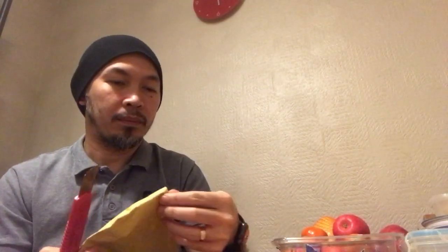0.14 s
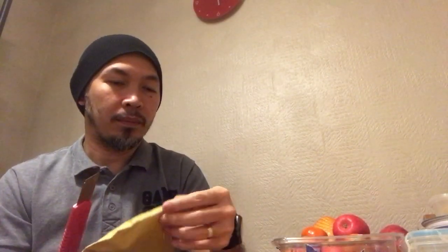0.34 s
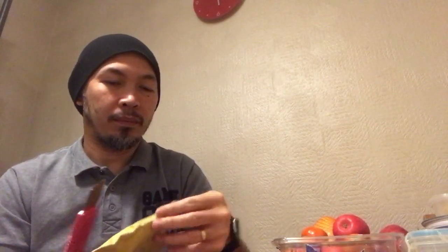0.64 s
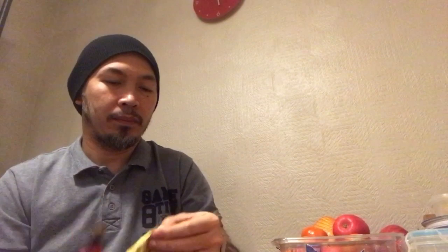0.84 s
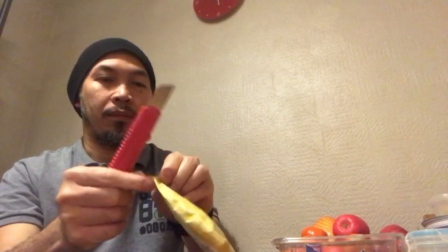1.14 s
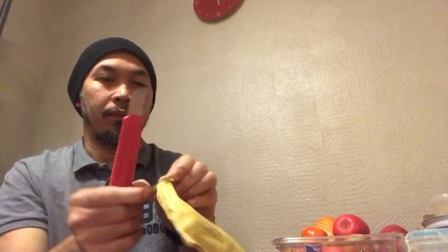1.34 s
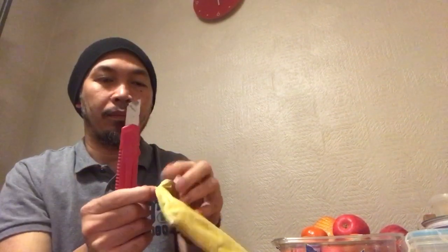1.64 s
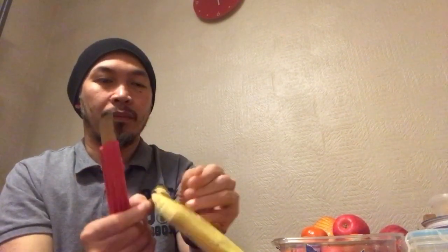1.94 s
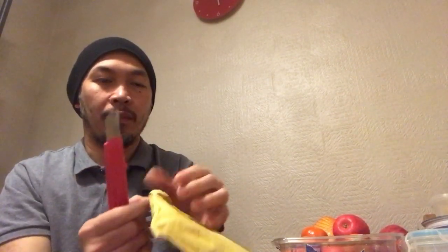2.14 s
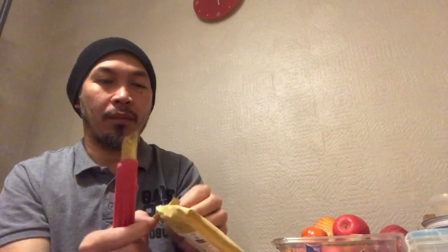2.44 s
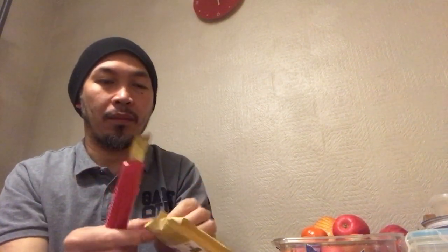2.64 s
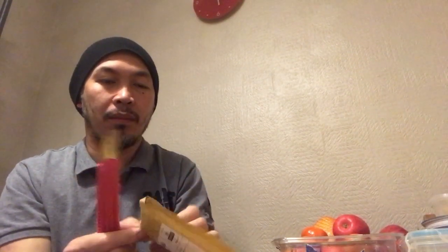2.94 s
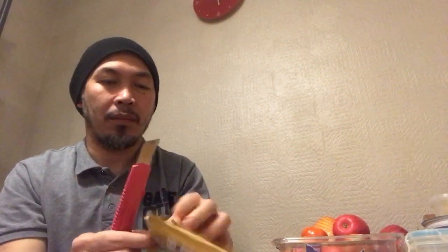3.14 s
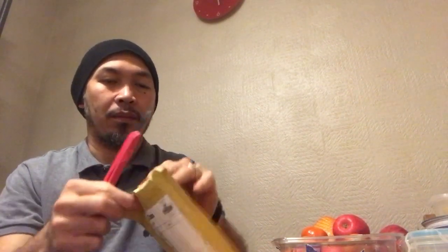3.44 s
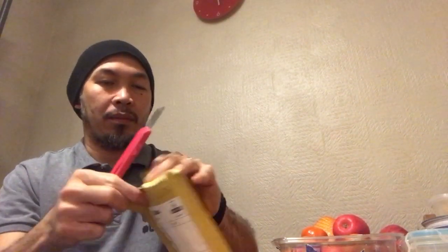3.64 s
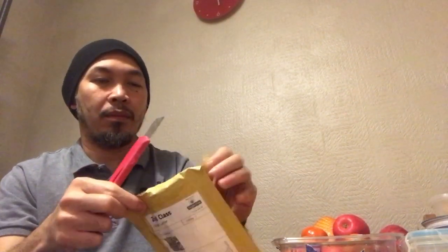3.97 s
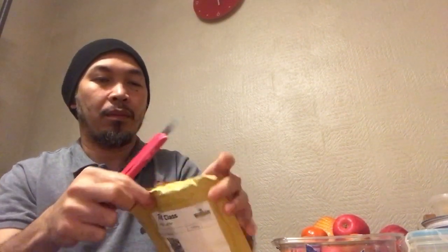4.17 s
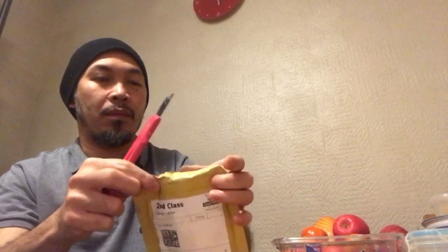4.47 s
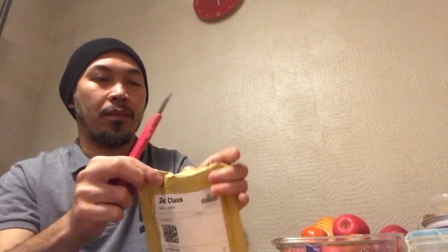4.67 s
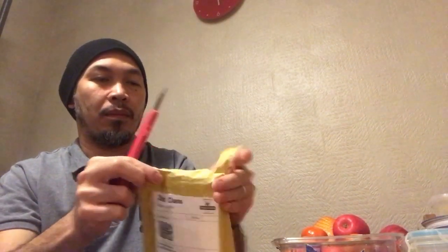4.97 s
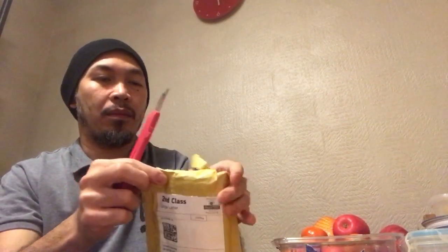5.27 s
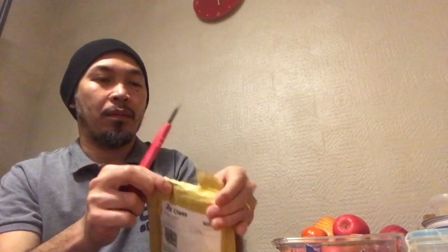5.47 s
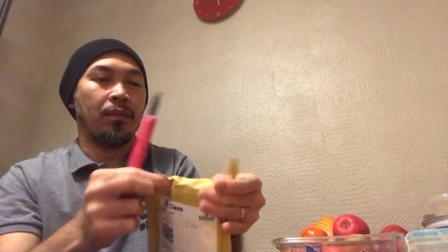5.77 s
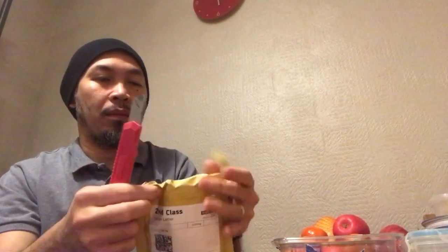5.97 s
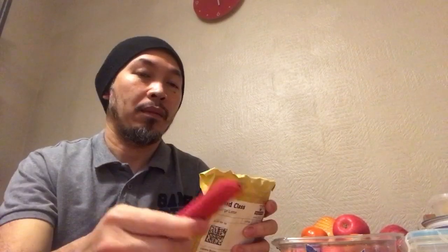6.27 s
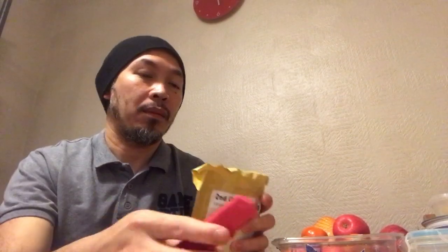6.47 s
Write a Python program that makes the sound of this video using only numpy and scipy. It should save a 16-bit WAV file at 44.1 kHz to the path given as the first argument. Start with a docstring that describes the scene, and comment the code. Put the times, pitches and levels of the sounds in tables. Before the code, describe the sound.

Close by in a small room, stiff paper rustles and crackles in irregular bursts as a padded envelope is gripped and opened. A knife blade ticks once, then four quick rips come among sharp paper snaps and soft, dull bumps. The crinkling grows fuller after the tearing, stops abruptly for a moment and ends with light handling. A faint, steady rumble lies underneath.

```python
"""Soft creasing of stiff paper comes first: a padded envelope is handled and torn open, close by at a table in
a small room. Each grip creases and rubs the paper and flexes its padding; panels buckle in single snaps, a
knife blade ticks once, and the flap rips in four short pulls. Near the end the scene changes: the opening stops
dead, and light handling goes on. A low, steady ambience lies under it all."""
import sys
import numpy as np
from scipy import signal
from scipy.fft import rfft, irfft, next_fast_len
from scipy.io import wavfile
from scipy.ndimage import uniform_filter1d, map_coordinates

SR = 44100
rng = np.random.default_rng(int(sys.argv[2]) if len(sys.argv) > 2 else 0)


def bounce(signal):
    """Save signal as a 16-bit WAV file at the path given by the first command-line argument."""
    frames = np.transpose(np.atleast_2d(signal))
    limited = np.clip(frames, -1, 1)
    pcm = np.round(limited * 32767).astype(np.int16)
    wavfile.write(sys.argv[1], SR, pcm)


N = 291573

# Tone colours of the sources. Each row: frequency in Hz, relative level in dB.
AMBIENCE_EQ = [(20, -18), (50, -5.5), (85, 1.5), (130, -2.5), (200, -7), (370, -4), (600, -23.5),
               (2000, -23), (6000, -22.5), (16000, -50)]
PADDING_EQ = [(70, -28.5), (130, -3.5), (240, -8.5), (380, 2), (490, -1.5), (620, 4.5), (850, -0.5),
              (1400, -30)]
CREASE_EQ = [(350, -30.5), (750, -10.5), (950, 1), (1300, 1), (1900, -2), (2400, -2), (2900, -7),
             (4100, -6.5), (5000, -18), (7000, -17.5), (10000, -37), (16000, -49)]
RUB_EQ = [(2500, -1.5), (4500, 7), (7000, 2.5), (9300, 2), (10300, -3), (12000, 1.5), (14000, 0.5),
          (16000, -10.5)]
CRACK_EQ = [(2000, -6), (3500, 3.5), (6000, 7.5), (8500, -0.5), (10300, -5), (12500, -1.5), (16000, -12.5)]
TEAR_EQ = [(150, -44), (400, -22), (740, -16), (1000, -5.5), (1280, 1.5), (1750, -8.5), (2350, -8.5),
           (4000, -13.5), (6000, -37), (16000, -22)]
# The room's tail. Each row: frequency in Hz, seconds to fade by 60 dB.
ROOM_DECAY = [(150, 0.83), (1200, 0.18), (5000, 0.46), (15000, 0.16)]
# The hands jolt the envelope. Each row: start in seconds, level in dB, decay time in seconds.
HAND_BUMPS = [(1.945, -31.5, 0.018), (3.152, -30, 0.022), (3.49, -34, 0.021), (3.55, -36.5, .053),
              (4.69, -32, .015), (4.825, -32, 0.019), (5.08, -34, 0.013), (6.19, -18, 0.0059)]
# A finger dents the padding. Each row: start in seconds, level in dB.
FINGER_DENTS = [(1.935, -26), (3.152, -22), (3.225, -24.5), (4.169, -23.5), (4.441, -30.5), (4.82, -10.5),
                (5.051, -26.5), (5.828, -26), (5.863, -22.5), (5.977, -28.5)]
# Between grips the held envelope keeps creasing faintly. Each row: time in seconds, level in dB.
HOLDING_BED = [(0, -48), (.25, -54.5), (.68, -42), (1.03, -42.5), (1.7, -45.5), (2.13, -51.5), (2.35, -44),
               (3.05, -37), (3.6, -40), (4.03, -41.5), (4.55, -33.5), (4.9, -35), (5.15, -45),
               (5.27, -42.5), (5.45, -41), (6.2, -37)]
# The fingers grip and shift. Each row: start in seconds, length in seconds, creasing level in dB,
# rubbing in dB against the creasing.
FINGER_GRIPS = [(.008, 0.012, -34.5, -24), (0.295, 0.027, -42.5, -9), (.35, .05, -34, -7.5),
                (0.605, 0.016, -39, -7), (0.713, .08, -35, -11), (0.863, 0.1, -39, -9),
                (1.116, 0.066, -31.5, -6.5), (1.198, 0.14, -34, 2.5), (1.331, 0.09, -30, -4),
                (1.546, 0.13, -36, -9), (1.916, 0.034, -27.5, -12), (2.219, .11, -41, -10.5),
                (2.454, 0.054, -37, -13.5), (2.583, 0.13, -33.5, -14.5), (2.86, 0.13, -31, -8.5),
                (3.133, 0.032, -33, -13), (3.213, 0.11, -34, -15), (3.382, 0.013, -31.5, -11),
                (3.434, 0.13, -34, -16.5), (4.089, 0.033, -28, -8.5), (4.166, 0.024, -28.5, -10.5),
                (4.393, 0.086, -29.5, -12.5), (4.615, .14, -24.5, -8), (4.762, 0.083, -27.5, -2.5),
                (4.938, 0.046, -24.5, -7.5), (5.044, 0.053, -31, -5.5), (5.297, 0.12, -31.5, -9.5),
                (5.484, .16, -25.5, -11.5), (5.722, 0.055, -26, -13), (5.824, 0.035, -29.5, -19),
                (6.052, 0.053, -32, -11), (6.194, 0.014, -25, -15), (6.263, 0.24, -45.5, -16),
                (6.334, 0.063, -36.5, -9)]
# Paper panels buckle. Each row: start in seconds, level in dB, ring pitch in Hz, crack trim in dB.
PANEL_SNAPS = [(0.6023, -22.5, 3850, -6.5), (0.749, -16, 1830, -9), (0.7567, -22.5, 2770, -5),
               (0.7802, -19, 2860, -0.5), (0.7846, -17.5, 3000, -2), (0.8742, -14.5, 2420, -1),
               (0.9148, -19.5, 4400, -2), (0.992, -29, 1960, -19), (1.081, -30, 2020, -3.5),
               (1.1264, -14, 1750, -21), (1.3116, -5.5, 1315, -41), (1.3515, -19, 1370, -28),
               (1.4132, -23.5, 1990, -22), (1.4424, -25, 1680, -24), (1.5567, -26.5, 1950, -10),
               (1.6427, -19.5, 1320, -13), (1.757, -28.5, 1710, -17), (1.7866, -19.5, 1890, -18),
               (1.797, -11, 2310, -5), (1.8195, -16, 1660, -16), (1.8539, -13, 2390, 0.5),
               (1.901, -16.5, 1340, -12), (1.9351, -17, 1340, -15), (2.2975, -27, 2230, -29),
               (2.3512, -27, 1190, -35), (2.3953, -25, 1760, -37), (2.5736, -31, 2480, -2.5),
               (2.8764, -15, 2010, -16), (2.9072, -14.5, 2580, -10), (2.959, -22, 2100, -23),
               (3.1396, -13.5, 2700, -31), (3.1448, -10, 2480, -11.5), (3.1529, -17.5, 2200, -4),
               (3.2251, -20.5, 2530, -22), (3.269, -14.5, 1450, -11), (3.4538, -22.5, 1680, -12),
               (3.693, -9.5, 2100, -3.5), (3.7137, -10, 1480, -25), (3.7196, -8, 1290, -23),
               (4.0815, -23, 3050, -12), (4.17, -22, 2300, -26), (4.4975, -18, 1980, -6.5),
               (4.579, -23, 1270, -18), (4.6807, -10, 2380, -19), (4.7754, -7.5, 1340, -11),
               (4.792, -13, 1240, -21), (4.8205, -4, 1900, -10), (4.8241, -4.5, 2140, -24),
               (4.8468, -8.5, 1010, -18), (4.9134, -16.5, 1150, -25), (4.9775, -16, 1330, -5),
               (5.2294, -32, 2440, -19), (5.2947, -19.5, 2890, -11), (5.5005, -9.5, 1560, -32),
               (5.6868, -19, 1640, -33), (5.8434, -20.5, 1160, -22), (5.8639, -20, 1240, -32),
               (5.9776, -18, 1220, -28), (6.0585, -19, 1470, -21), (6.2015, -17.5, 1320, -19),
               (6.335, -27, 3200, 5.5), (6.355, -24, 2250, -7), (6.3724, -29, 3200, -13)]
# Pulls that rip the flap. Each row: start in seconds, length in seconds, tearing level in dB,
# parting fibres in dB against the tearing, tilt of the fibres' tone in dB per octave.
FLAP_PULLS = [(1.81, 0.089, -20, -4.5, 1.5), (2.743, 0.072, -22, -4, -4), (3.659, 0.095, -12, -10, 1.5),
              (3.861, .1, -14.5, -12, 2.5)]

CUT_S = 6.211  # the scene changes here


def amp(db):
    """Decibels to gain."""
    return 10 ** (np.asarray(db) / 20)


def unit(x):
    """Scale to rms 1."""
    return x / np.sqrt(np.mean(x ** 2) + 1e-20)


def burst(x):
    """Scale a short sound to the energy of 4 ms at rms 1."""
    return x / np.linalg.norm(x) * np.sqrt(.004 * SR)


def along(points, hz):
    """Read a curve of (Hz, value) points on a log frequency axis."""
    freqs, values = np.transpose(points)
    return np.interp(np.log(hz + 1), np.log(freqs + 1), values)


def wobble(rate):
    """A smooth random curve with rate knots a second."""
    knots = rng.standard_normal(int(N * rate / SR) + 4)
    return map_coordinates(knots, [np.arange(N) * rate / SR])


def add(track, start, sound):
    """Mix a sound into a track at start seconds."""
    part = track[max(0, round(start * SR)):][:len(sound)]
    part += sound[:len(part)]


def coloured(x, eq, size=2048):
    """Minimum-phase EQ, so that clicks keep their sharp front; rms 1."""
    gains = amp(along(eq, np.fft.rfftfreq(size, 1 / SR)))
    cepstrum = irfft(np.log(gains))
    cepstrum[1:size // 2] *= 2
    cepstrum[size // 2 + 1:] = 0
    impulse = irfft(np.exp(rfft(cepstrum)))
    return unit(signal.fftconvolve(x, impulse)[:len(x)])


def crackle(rate, spread_db, friction):
    """Tiny random breaks of uneven size, about rate a second, over a share of smooth friction."""
    sizes = amp(spread_db * np.clip(rng.standard_normal(N), -2, 2)) * rng.choice([-1, 1], N)
    breaks = sizes * (rng.random(N) < rate / SR)
    return unit(breaks) + friction * rng.standard_normal(N)


def flexed(x, depth_db, size=256, frames=14):
    """The sheet's resonances shift as it bends: a random comb of gains drifts over the given frames."""
    spectrum = signal.stft(x, nperseg=size)[2]
    comb = uniform_filter1d(rng.standard_normal(spectrum.shape), size=3, axis=0)
    comb = unit(uniform_filter1d(comb, size=frames, axis=1))
    return unit(signal.istft(spectrum * amp(depth_db * comb), nperseg=size)[1][:N])


def facets(x):
    """Each break rings in its own small facet of paper, so the colour keeps changing."""
    return flexed(x, depth_db=4.5, size=128, frames=4)


def stroke(start, length, attack_s, release_s, arch_db):
    """Gain of one hand move: it takes hold, presses hardest halfway and lets go; none crosses the cut."""
    t = np.arange(N) / SR
    progress = np.clip((t - start) / length, 0, 1)
    fades = np.exp(np.minimum(t - start, 0) / attack_s - np.maximum(t - start - length, 0) / release_s)
    arch = amp(-arch_db * (2 * progress - 1) ** 2)
    return fades * arch * ((t < CUT_S) | (start > CUT_S))


def ambience():
    """A steady bed of low rumble and faint hiss."""
    return amp(-50.0) * coloured(rng.standard_normal(N), AMBIENCE_EQ)


def echoes(walls_db=-19.0, tail_db=-13.0):
    """Table, chest and near wall return quick slaps; the room adds a short tail."""
    hz, t, noise = signal.stft(rng.standard_normal(SR // 2), SR, nperseg=256)
    fade = amp(-60 * t / along(ROOM_DECAY, hz)[:, None])
    tail = signal.istft(noise * fade, SR, nperseg=256)[1]
    response = np.zeros(SR // 2)
    add(response, .006, amp(tail_db) * tail / np.linalg.norm(tail))
    for delay in rng.uniform(.0015, .012, size=7):
        add(response, delay, amp(walls_db) * rng.choice([-1, 1], size=1))
    return response


def room(x, size=8192):
    """The envelope keeps moving, so each short stretch of sound meets a new pattern of echoes."""
    out = x.copy()
    for start in range(0, N, size):
        stretch = x[start:start + size]
        if stretch.any():
            add(out, start / SR, signal.fftconvolve(stretch, echoes()))
    return out


def bumps(pitch_hz=82, attack_s=0.0043):
    """A jolt of the hands and envelope gives a soft low thump."""
    out, t = np.zeros(N), np.arange(SR // 4) / SR
    tone = np.sin(2 * np.pi * pitch_hz * t) * (1 - np.exp(-t / attack_s))
    for start, db, decay_s in HAND_BUMPS:
        add(out, start, amp(db) * tone * np.exp(-t / decay_s))
    return out


def dents(decay_s=0.0067):
    """The padding gives way under a finger with a dull pop."""
    out, t = np.zeros(N), np.arange(SR // 16) / SR
    for start, db in FINGER_DENTS:
        pop = coloured(rng.standard_normal(len(t)), PADDING_EQ) * np.exp(-t / decay_s)
        add(out, start, amp(db) * burst(pop))
    return out


def blade(start_s=1.1268, decay_s=0.00046):
    """The thin knife blade catches the edge of the envelope with one bright tick."""
    out, t = np.zeros(N), np.arange(SR // 50) / SR
    ring = np.sin(2 * np.pi * 11600 * t) + np.sin(2 * np.pi * 13100 * t)
    add(out, start_s, amp(-11) * burst(ring * np.exp(-t / decay_s)))
    return out


def handling(holding_rub_db=-10.5, settled_db=-57):
    """Gain rides for creasing and rubbing: the grips on top of the faint stir of holding."""
    times, levels_db = np.transpose(HOLDING_BED)
    crease_power = amp(np.interp(np.arange(N) / SR, times, levels_db, right=settled_db)) ** 2
    rub_power = crease_power * amp(holding_rub_db) ** 2
    for start, length, db, rub_db in FINGER_GRIPS:
        force = amp(db) * stroke(start, length, attack_s=0.016, release_s=0.019, arch_db=2)
        crease_power += force ** 2
        rub_power += (amp(rub_db) * force) ** 2
    return np.sqrt(crease_power), np.sqrt(rub_power)


def rustle(padding_db=-11.5):
    """Fingers crease the paper, flex the padding and slide over the surface, in uneven clumps."""
    crease_gain, rub_gain = handling()
    clumps = amp(2.7 * wobble(60))
    creases = crackle(rate=480, spread_db=4.0, friction=1.0)
    paper = flexed(coloured(facets(creases), CREASE_EQ), depth_db=1.0)
    crunch = creases + crackle(rate=200, spread_db=12.5, friction=0.57)
    padding = amp(padding_db) * coloured(crunch, PADDING_EQ)
    grit = 0.45 * creases + crackle(rate=1400, spread_db=8.5, friction=0.99)
    rubbing = flexed(coloured(grit, RUB_EQ), depth_db=-0.2)
    return clumps * (crease_gain * (paper + padding) + rub_gain * rubbing)


def snaps(ring_db=-1, flutter_db=-5.5, thud_db=-19.5):
    """A panel pops through: a brief ring, a flutter in the sheet, a crack and a thud in the padding."""
    out, t = np.zeros(N), np.arange(SR // 16) / SR
    rise = 1 - np.exp(-t / 0.0002)
    crack_fade = np.exp(-t / 0.0001) + 0.064 * np.exp(-t / 0.0015)
    for start, db, hz, crack_db in PANEL_SNAPS:
        noise = rng.standard_normal((3, len(t)))
        overtone_hz = hz * rng.uniform(1.455, 2.22)
        # a panel needs about half a cycle to gather speed
        speed = np.sin(2 * np.pi * hz * t) * np.exp(-t * hz / 0.94) * (1 - np.exp(-2 * t * hz))
        speed += 0.058 * np.sin(2 * np.pi * overtone_hz * t) * np.exp(-t * hz / 2.7)
        # a small panel radiates its acceleration, which thins out the bass
        ring = amp(ring_db) * rng.choice([-1, 1]) * burst(np.gradient(speed * rise))
        flutter = amp(flutter_db) * burst(coloured(noise[0], CREASE_EQ) * rise * np.exp(-t / 0.0033))
        crack = amp(crack_db + 0.5) * burst(coloured(noise[1], CRACK_EQ) * rise * crack_fade)
        thud = amp(thud_db) * burst(coloured(noise[2], PADDING_EQ) * np.exp(-t / 0.0044))
        add(out, start, amp(db) * (ring + flutter + crack + thud))
    return out


def rips(pivot_hz=6000):
    """Fibres part in a fast, uneven run with a fine hiss; each break tugs the sheet, which rings."""
    # the tear catches and runs on, many times within one pull
    catches = unit(amp(1.54 * wobble(130)))
    breaks = crackle(rate=1500, spread_db=3.0, friction=0.4)
    sheet = coloured(facets(breaks * catches), TEAR_EQ)
    parting = catches * (0.5 * breaks + rng.standard_normal(N))
    out = np.zeros(N)
    for start, length, db, fibres_db, tilt_db in FLAP_PULLS:
        fibre_eq = [(hz, level + tilt_db * np.log2(hz / pivot_hz)) for hz, level in RUB_EQ]
        fibres = amp(fibres_db) * coloured(parting, fibre_eq)
        pull = amp(db) * stroke(start, length, attack_s=0.01, release_s=0.013, arch_db=4)
        out += pull * (sheet + fibres)
    return out


def scene():
    """The envelope in the room, over the ambience, in mono."""
    paper = rustle() + rips() + snaps() + dents() + blade() + bumps()
    before_cut = np.arange(N) < CUT_S * SR
    # at the cut the first scene stops dead, together with its echo, and the second begins
    opening = room(paper * before_cut) * before_cut
    light_handling = room(paper * ~before_cut)
    return (opening + light_handling + ambience())[None]


def record(dry, top_hz=16000):
    """Soft-clip the loudest snaps and remove everything above top_hz."""
    clipped = dry / (1 + np.abs(dry) ** 8) ** (1 / 8)
    size = next_fast_len(N + SR // 2)
    passband = np.fft.rfftfreq(size, 1 / SR) < top_hz
    return irfft(rfft(clipped, size) * passband, size)[..., :N]


dry = scene()
out = record(dry)
bounce(out)
```